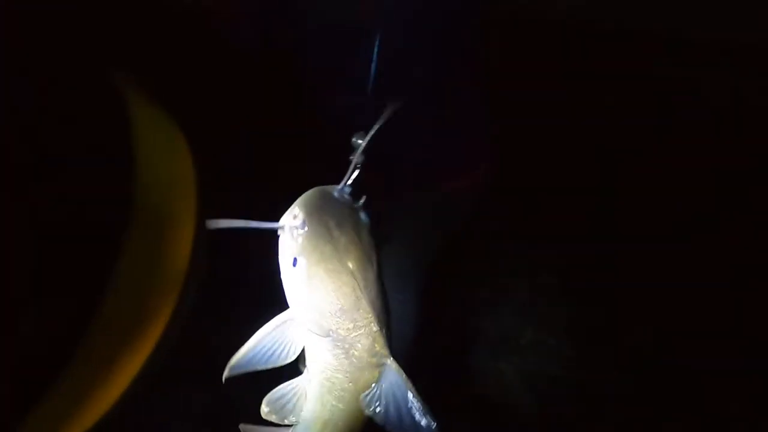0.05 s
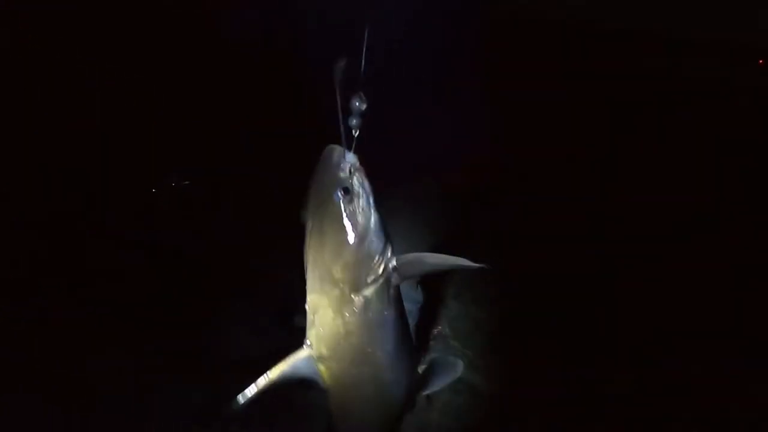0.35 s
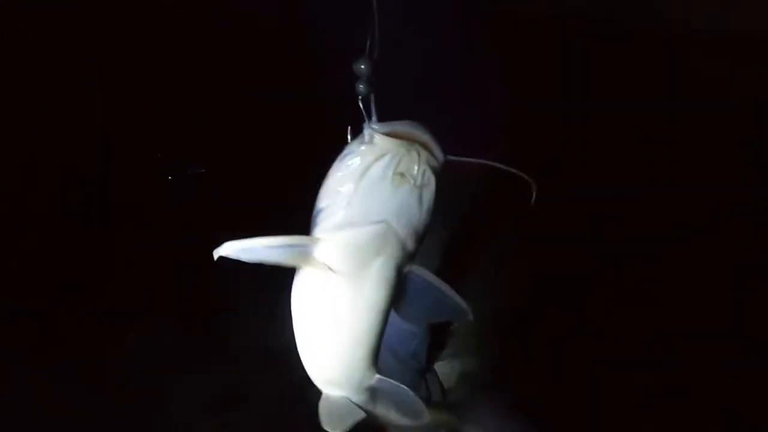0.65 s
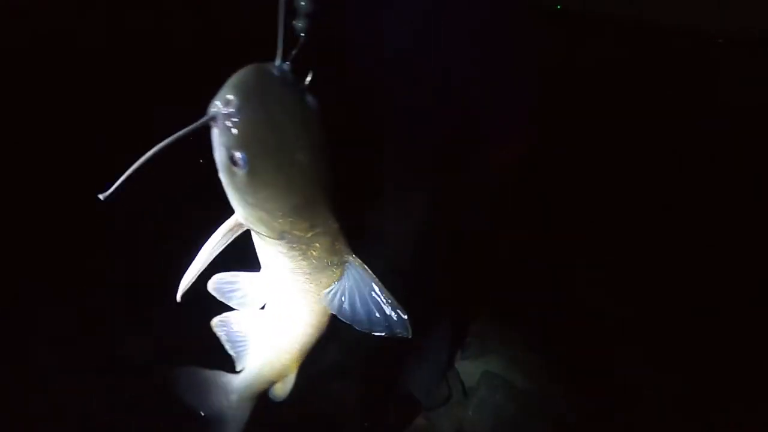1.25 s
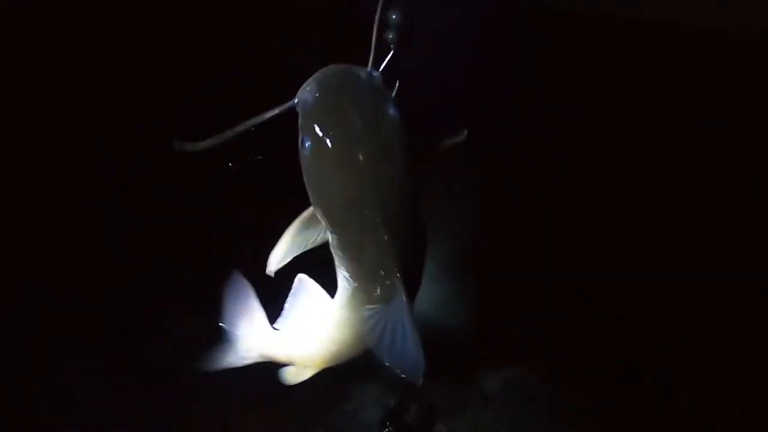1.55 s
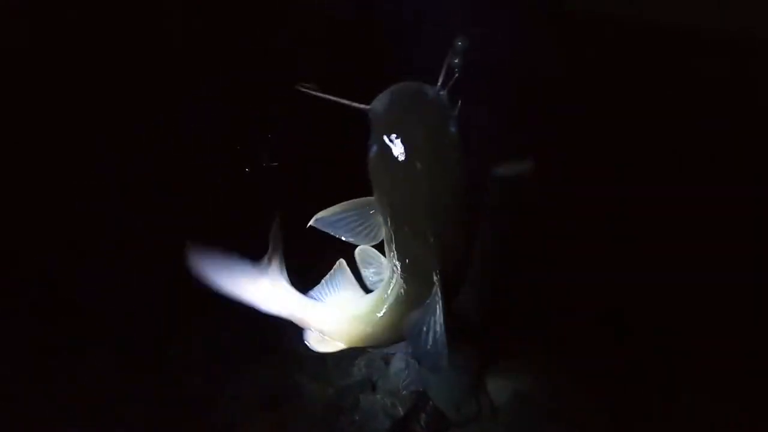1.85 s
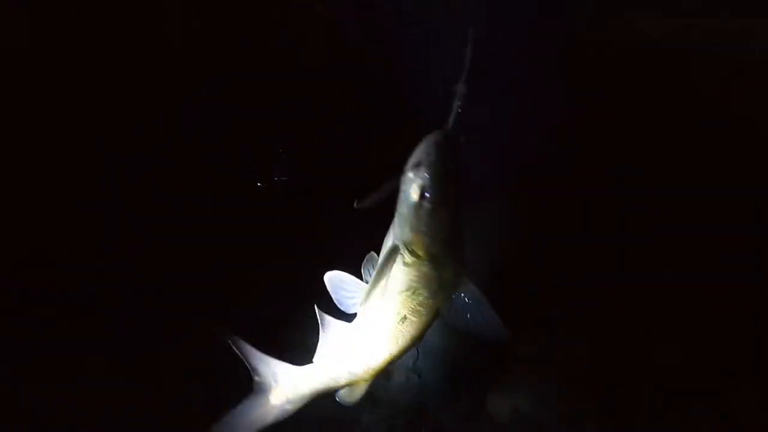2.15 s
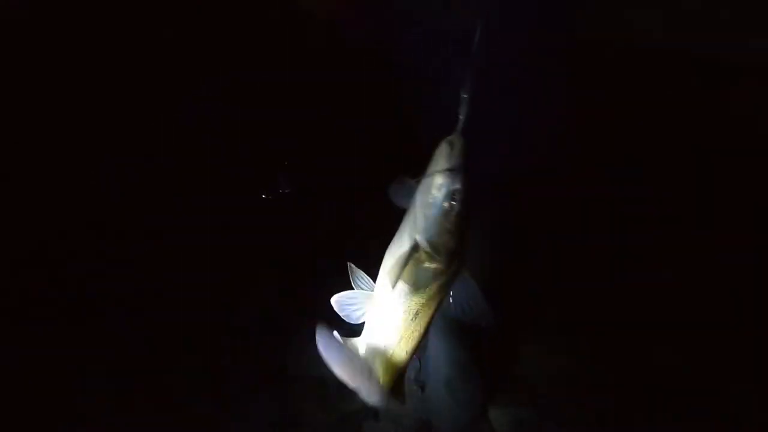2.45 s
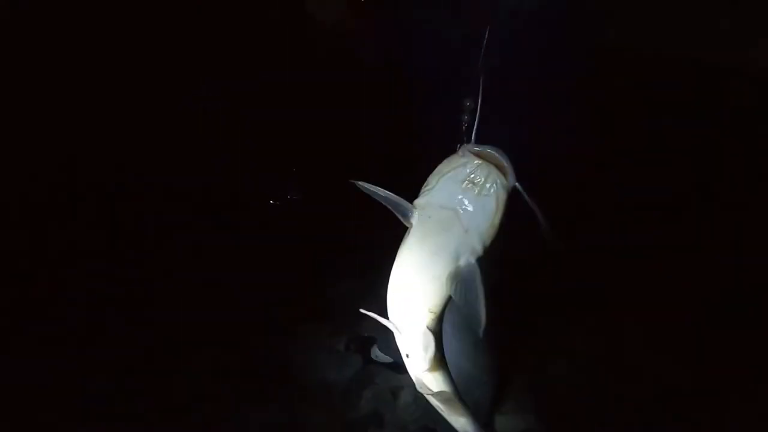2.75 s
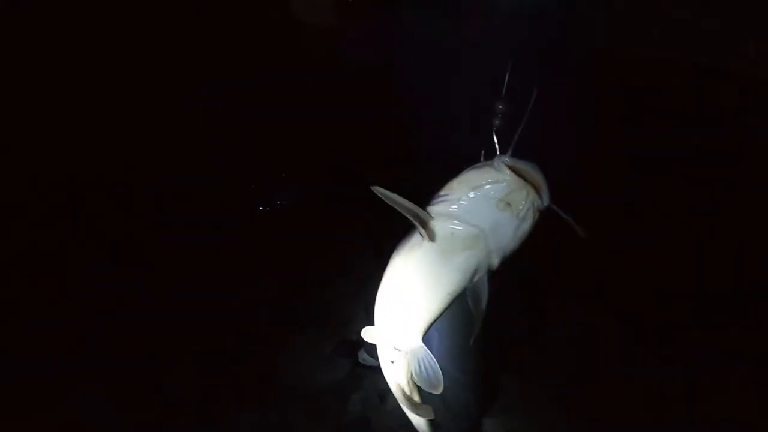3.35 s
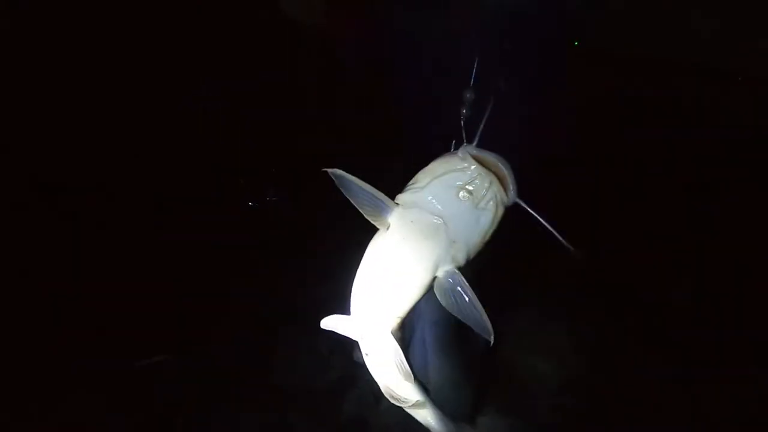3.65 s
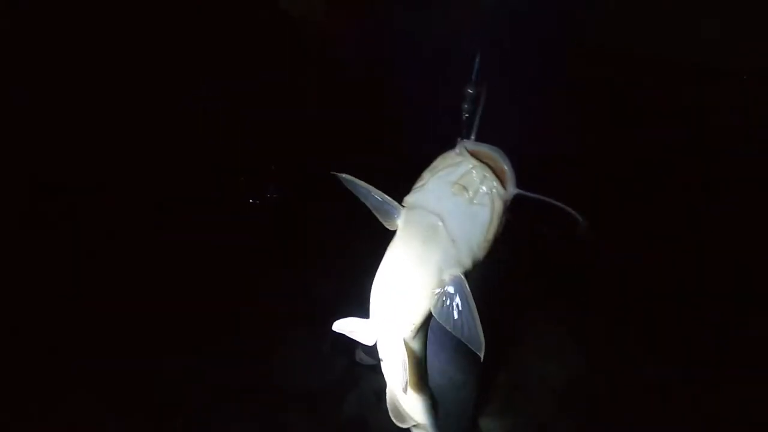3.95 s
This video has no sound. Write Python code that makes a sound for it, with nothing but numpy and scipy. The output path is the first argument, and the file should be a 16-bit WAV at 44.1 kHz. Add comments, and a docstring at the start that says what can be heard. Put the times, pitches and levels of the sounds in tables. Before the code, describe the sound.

A catfish croaks in very short, clicking grunts: a pair at the start, a pair around 1 second with a sharp snap, single croaks near 1.9 and 2.5 seconds, another pair just after 3 and a last one at 3.7. Low wind rumbles and thumps on the microphone throughout, often louder than the fish. Far crickets pulse faintly, with soft rustles around 0.5 seconds and a few tiny ticks.

```python
"""A catfish hangs on a line outdoors at night and croaks by grinding its fin spines in their sockets.
Each stroke is a short run of clicks from tiny ridges that speeds up, slows down and rings the bony body.
In some strokes the spine catches and jerks free with a snap. Wind rumbles and thumps on the microphone.
Behind it are far crickets pulsing together, soft rustles, a few small ticks and faint high squeaks."""
import sys
import numpy as np
from scipy import signal
from scipy.fft import rfft, irfft
from scipy.io import wavfile

SR = 44100
rng = np.random.default_rng(int(sys.argv[2]) if len(sys.argv) > 2 else 0)


def file_out(sig):
    """Save sig as 16-bit WAV at sys.argv[1]."""
    # one column per channel
    cols = np.atleast_2d(sig).T
    # limit, then scale
    lim = np.clip(cols, -1, 1)
    pcm = np.round(lim * 32767).astype(np.int16)
    wavfile.write(sys.argv[1], SR, pcm)


N = 176400
T = np.arange(N) / SR

# The tone of a spine's click. Each row: frequency in Hz, boost or cut in dB.
CLICK_TONE = [(500, -36.5), (1000, 11), (2500, -1), (4200, 9), (5600, 5), (7500, -2), (8600, -2.5),
              (10000, -8.5), (11500, -24), (15000, -51.5)]


def catfish():
    """The fish's fin strokes and jerks, with a short echo from the ground nearby."""
    # Each row: start, length, fastest moment and hardest moment in seconds, top clicks per second,
    # slowing and roughness from 0 to 1, click level in dB, then pitch in Hz and level in dB
    # for each of four ringing tones (body, middle, bone, spine).
    strokes = [ (-.004, 0.063, .028, .02, 501, 0.28, 0.31, -50, 810, -44, 1790, -48, 3320, -47.5, 5140, -67),
               (.079, 0.055, .104, .104, 380, .15, 0.27, -53.5, 790, -42.5, 1750, -50, 3160, -48, 5940, -70),
               (0.942, 0.052, .964, .976, 514.3, 0.28, 0.22, -54.5, 910, -41, 2030, -47.5, 3280, -49.5, 5050, -65),
               (1.042, 0.056, 1.066, 1.066, 453.4, 0.18, 0.42, -51, 820, -38.5, 1720, -50, 3380, -52, 5740, -68),
               (1.853, 0.053, 1.875, 1.879, 566, 0.41, 0.058, -51.5, 910, -39, 2700, -57, 3500, -55.5, 4390, -63),
               (2.509, 0.058, 2.529, 2.532, 555, 0.34, 0.085, -53.5, 980, -38, 2010, -53, 3100, -63, 4770, -66),
               (3.075, 0.053, 3.099, 3.102, 534, .27, 0.03, -52.5, 914, -36.5, 1560, -45, 3150, -48, 4140, -68),
               (3.206, 0.061, 3.229, 3.236, 534.7, 0.28, 0.11, -49, 895, -38, 1490, -45.5, 2940, -42.5, 4150, -59.5),
               (3.699, 0.058, 3.732, 3.736, 514, .22, 0.073, -52.5, 1214, -42.5, 2070, -42.5, 3500, -48.5, 4930, -68)]
    # Each row: start and end of a run of jerks in seconds, jerks per second, ring and snap gains in dB.
    catches = [(.0988, .122, 200, -57, -36.5), (1.0413, 1.06, 71, -37, -27), (1.062, 1.079, 159, -37, -33),
               (3.2334, 3.254, 177, -48, -39)]
    out = np.zeros(N)
    for stroke in strokes:
        add(out, stroke[0], croak(*stroke))
    echo_db, echo_fade_s = -11, .08
    t = T[:SR // 6]
    tail = rng.standard_normal(len(t)) * amp(-60 * t / echo_fade_s) * (t > .002)
    for start, end, rate, ring_db, snap_db in catches:
        for s in np.arange(start, end, 1 / rate):
            add(out, s, jerk(ring_db, snap_db))
    return out + amp(echo_db) * signal.fftconvolve(out, tail / np.linalg.norm(tail))[:N]


def croak(start, length, fastest, hardest, top_hz, droop, roughness, click_db, *rings, size=4096):
    """Ridges click past, faster then slower; the sound is brightest where the spine presses hardest."""
    # One value for each ringing tone: its width in Hz (wider dies away sooner).
    ring_widths = [240, 330, 500, 700]
    # One value for each ringing tone: how closely it follows the pressure, from 0 to 1.
    ring_follows = [.1, .6, .8, .9]
    attack_s, release_s, press_s, shimmer_db = .004, .007, .011, 12
    t = np.arange(size) / SR
    slowness = np.interp(start + t, [start, fastest, start + length], [-1, 0, 1]) ** 2
    rough = roughness + .16 * np.sqrt(slowness)  # the spine grinds less evenly as it slows
    wobble = .018 * drift(70, size) + .17 * rough * drift(260, size)
    ridges_passed = np.cumsum(top_hz * (1 - droop * slowness) * np.exp(wobble)) / SR
    # Stacked overtones add up to one sharp click for each ridge.
    clicks = unit(sum(np.cos(2 * np.pi * k * ridges_passed) for k in range(1, 32)))
    clicks *= amp(shimmer_db * rough * drift(260, size))
    scrape = 1.3 * rough * rng.standard_normal(size)
    fade = np.clip(t / attack_s, 0, 1) * np.clip((length - t) / release_s, 0, 1)
    grind = (clicks + scrape) * fade
    pressure = .2 + np.exp(-.5 * ((start + t - hardest) / press_s) ** 2)
    sound = amp(click_db) * unit(colour(grind * pressure, CLICK_TONE))
    for hz, db, width, follow in zip(rings[::2], rings[1::2], ring_widths, ring_follows):
        sound += amp(db) * unit(ring(grind * pressure ** follow, hz, width))
    return sound * np.sqrt(length * SR / size)  # so the levels apply to the stroke, not the silence


def jerk(ring_db, snap_db, size=2048):
    """One hard slip of the spine makes a snap and sets the bones ringing."""
    # Each row: pitch in Hz, relative level in dB, seconds to fade by 60 dB.
    bone_tones = [(890, -3, 0.036), (1720, -8.5, 0.086), (3120, -2.5, 0.053), (2870, -7, 0.011),
                  (3800, -5.5, 0.018), (5500, -7.5, 0.013), (8700, -9.5, 0.01), (10500, -22.5, 0.012)]
    t = np.arange(size) / SR
    bones = np.zeros(size)
    for hz, db, fade_s in bone_tones:
        pitch = hz * (1 + .01 * rng.standard_normal())
        bones += amp(db - 60 * t / fade_s) * np.sin(2 * np.pi * pitch * t)
    snap = colour(rng.standard_normal(size) * np.exp(-t / .00011), CLICK_TONE)
    snap = snap / abs(snap).max() * (t < t[-1] / 2)
    treble_cut = signal.butter(8, 10800, fs=SR, output="sos")
    return signal.sosfilt(treble_cut, amp(ring_db) * bones + amp(snap_db) * snap)


def wind_rumble():
    """Wind presses on the microphone; small swirls of air come and go faster than big ones."""
    # Each row: frequency in Hz, boost or cut in dB.
    rumble_tone = [(8, -19.5), (25, 1), (55, -0.5), (88, -0.5), (125, -5.5), (180, -12.5), (260, -21),
                   (400, -38.5), (700, -52.5), (1400, -64), (15000, -130)]
    # Each row: time in seconds, relative level in dB.
    wind_levels = [(0.0, -21), (0.97, -26.5), (0.98, -21), (2.16, -23), (2.18, -36), (2.26, -20),
                   (2.39, -37.5), (2.55, -20), (2.66, -36), (2.78, -18.5), (3.07, -26.5), (3.09, -21.5),
                   (3.48, -22.5), (3.53, -14.5), (3.58, -32.5), (3.71, -20), (3.95, -23.5), (4.0, -41)]
    split_hz, deep_flutter_db, upper_flutter_db = 150, .36, 11
    air = unit(colour(rng.standard_normal(N), rumble_tone))
    small_swirls = irfft(rfft(air) / (1 + (split_hz / frequencies(N)) ** 4), N)
    deep = (air - small_swirls) * amp(deep_flutter_db * drift(12))
    upper = small_swirls * amp(upper_flutter_db * np.tanh(drift(18)))
    level_db = 1.5 + np.interp(T, *np.transpose(wind_levels))
    sway = amp(-31.5) * drift(50)  # the slowest pressure swings go on through the lulls
    return unit(deep + upper) * amp(level_db) + sway


def wind_gusts(size=8192):
    """Each gust is a brief, low swell of churning air, some duller and some brighter."""
    # Each row: middle and length in seconds, relative level in dB, Hz where the treble falls away.
    gusts = [(0.052, 0.023, -19.5, 394), (0.094, 0.03, -24.5, 516), (0.136, 0.051, -19, 510),
             (0.218, 0.0078, -21.5, 474), (0.321, 0.018, -21.5, 497), (0.371, 0.02, -15, 750),
             (0.466, 0.013, -21.5, 453), (0.506, 0.019, -24, 585), (0.733, 0.035, -23, 278),
             (0.785, 0.017, -19, 273), (0.979, 0.011, -13, 429), (1.155, 0.017, -16, 416),
             (1.196, 0.014, -26, 340), (1.252, 0.025, -19.5, 323), (1.297, 0.036, -20, 440),
             (1.326, 0.026, -16.5, 500), (1.466, 0.0094, -27.5, 480), (1.616, 0.011, -27, 430),
             (1.57, 0.012, -16, 450), (1.651, 0.023, -17.5, 640), (1.812, 0.022, -23, 358),
             (1.957, 0.08, -24, 220), (1.987, 0.016, -25.5, 350), (2.047, 0.027, -21.5, 390),
             (2.079, 0.014, -25, 443), (2.144, 0.026, -23.5, 330), (2.228, 0.02, -16.5, 257),
             (2.543, 0.04, -28, 600), (2.836, 0.039, -20, 452), (2.883, 0.029, -23, 500),
             (3.018, 0.018, -21.5, 313), (3.141, 0.011, -16.5, 441), (3.218, 0.0069, -27, 556),
             (3.243, 0.019, -25.5, 710), (3.259, 0.0086, -18, 603), (3.291, 0.0071, -20.5, 361),
             (3.393, 0.02, -19, 330), (3.489, 0.015, -17.5, 507), (3.543, 0.019, -15, 388),
             (3.647, 0.013, -23.5, 236), (3.767, 0.0077, -27, 320), (3.819, 0.018, -15, 270),
             (3.86, 0.044, -23.5, 394), (3.895, 0.029, -18.5, 356), (3.955, 0.029, -25, 253),
             (3.988, 0.018, -11.5, 390)]
    low_cut_hz, flutter_db = 107, 4
    out, t = np.zeros(N), (np.arange(size) - size / 2) / SR
    for middle, length, db, top_hz in gusts:
        swell = 1 / np.cosh(t / (.44 * length))
        air = noise(lambda f: (1 + (f / top_hz) ** 2) ** -2.248 / np.hypot(1, (low_cut_hz / f) ** 2), size)
        flutter = amp(flutter_db * drift(90, size))
        puff = unit(air * swell * flutter) * np.sqrt(np.mean(swell ** 2))
        add(out, middle + t[0], amp(db - 1) * puff)
    return out


def wind_thuds(pitch_hz=423, size=2048):
    """A swirl of air strikes the microphone with a very short thud."""
    # Each row: time in seconds, level in dB, fade time in seconds.
    thuds = [(.1548, -17, 0.00044), (.3263, -19, 0.00046), (0.364, -27, 0.004), (0.3689, -21, 0.0012),
             (.3804, -24, 0.0011), (0.9823, -28, 0.00033), (1.165, -33, 0.00065), (1.3209, -15.5, 0.00028),
             (1.5673, -22, 0.0004), (1.6506, -8, 0.00027), (1.6687, -14, 0.0023), (1.8006, -21, 0.00078),
             (2.049, -30, 0.00076), (3.017, -28.5, 0.00084), (3.1366, -27.5, 0.0015),
             (3.1483, -23.5, 0.0014), (3.2649, -15.5, 0.00045), (3.3855, -23.5, 0.00099),
             (3.4926, -16, 0.00028), (3.5352, -16, 0.001), (3.8563, -18, 0.00059), (3.8908, -16.5, 0.00088)]
    out, t = np.zeros(N), (np.arange(size) - size / 2) / SR
    for s, db, fade_s in thuds:
        wave = np.sin(2 * np.pi * (pitch_hz * t + rng.random()))
        add(out, s + t[0], amp(db) * wave / np.cosh(t / fade_s))
    return out


def crickets():
    """Far crickets chirp together, each chirp sagging a little in pitch."""
    # Each row: time in seconds, relative level in dB.
    chorus_levels = [(0, -49.5), (.8, -53), (2.0, -51.5), (2.4, -52.5), (2.75, -48), (3.2, -53.5),
                     (3.55, -56.5), (4, -52.5)]
    pitch_hz, width_hz, sag_hz = 2101, 143, 25.2
    period_s, peak_at_s, pulse_db, waver_db = .1775, 2.38, 3.5, 2.16
    pulse = np.cos(2 * np.pi * (T - peak_at_s) / period_s)
    band = noise(lambda f: 1 / (1 + (abs(f - pitch_hz) / width_hz) ** 2.7))
    trill = (signal.hilbert(band) * np.exp(1j * sag_hz * period_s * pulse)).real  # bends the pitch
    chorus_db = np.interp(T, *np.transpose(chorus_levels)) - 2
    return trill * amp(chorus_db + pulse_db * pulse + waver_db * drift(21))


def night_air():
    """A faint, steady hiss."""
    # Each row: frequency in Hz, boost or cut in dB.
    air_tone = [(200, 14), (700, -2.5), (1300, 5.5), (2500, 4.5), (3600, -2.5), (5500, -2.5), (7800, -4.5),
                (9000, -12), (11000, -21.5), (15000, -34.5)]
    return amp(-62) * unit(colour(rng.standard_normal(N), air_tone))


def rustles(top_hz=8800, grain_db=1.2, size=32768):
    """Soft, slightly grainy swells of hiss."""
    # Each row: middle and length in seconds, level in dB, centre in Hz, spread in octaves.
    swells = [(0.178, 0.39, -57, 1540, 1.3), (0.348, 0.055, -53, 1600, 0.62),
              (0.455, 0.059, -50, 1800, 1.17), (0.516, 0.058, -44, 970, 1.29),
              (0.612, 0.085, -53, 1750, 1.07), (0.683, 0.041, -49, 2030, 0.93),
              (0.742, 0.081, -54.5, 3720, 0.63), (0.743, 0.084, -60, 4160, 0.067),
              (1.211, 0.37, -61, 1350, 0.24), (1.557, 0.18, -66, 5950, 0.2),
              (1.612, 0.067, -60, 2750, 0.54), (2.659, 0.074, -61, 3470, 1.5),
              (2.895, 0.22, -57, 2000, 1.06), (3.469, 0.21, -60.5, 2950, 0.83),
              (3.945, 0.22, -60, 2630, 0.81)]
    out, t = np.zeros(N), (np.arange(size) - size / 2) / SR
    for middle, length, db, hz, octaves in swells:
        hiss = noise(lambda f: hump(f, hz, octaves) / (1 + (f / top_hz) ** 8), size)
        swell = np.exp(-abs(2 * t / length) ** 3 / 2)
        add(out, middle + t[0], hiss * swell * amp(db + grain_db * drift(200, size)))
    return out


def ticks(fade_s=.0024, size=1024):
    """Tiny dry ticks of fishing tackle or drops."""
    # Each row: start in seconds, relative level in dB, pitch in Hz.
    taps = [(0.359, -44, 3900), (2.464, -42.5, 4100), (2.783, -43, 3400), (3.146, -45.5, 3400),
            (2.208, -58, 9200)]
    out, t = np.zeros(N), np.arange(size) / SR
    fade = np.minimum(2 * t / fade_s, 1) * np.exp(-t / fade_s)
    for s, db, hz in taps:
        add(out, s, amp(db) * fade * noise(lambda f: hump(f, hz, octaves=.28), size))
    return out


def squeaks(width_s=.0099):
    """Brief, faint and very high wisps of sound."""
    # Each row: middle in seconds, level in dB.
    wisps = [(1.543, -76), (2.272, -79), (2.8, -78)]
    level = sum(amp(db) * np.exp(-.5 * ((T - s) / width_s) ** 2) for s, db in wisps)
    return level * noise(lambda f: hump(f, centre_hz=10250, octaves=.049))


def amp(db):
    """Turns decibels into a number to multiply by."""
    return 10 ** (np.asarray(db) / 20)


def unit(x):
    """Scales a sound to an average strength (rms) of 1."""
    return x / np.sqrt(np.mean(x ** 2) + 1e-20)


def frequencies(size):
    """The frequencies in a sound of this many samples, never below 1 Hz."""
    return np.maximum(np.fft.rfftfreq(size, 1 / SR), 1)


def colour(x, points):
    """Shapes a sound's tone along a curve of (Hz, dB) points."""
    f, db = np.transpose(points)
    hz = np.fft.rfftfreq(len(x), 1 / SR)
    gain = amp(np.interp(np.log(hz + 1), np.log(f), db))
    return irfft(rfft(x) * gain, len(x))


def noise(shape, size=N):
    """Noise of strength 1; shape says how much of each frequency it holds."""
    return unit(irfft(rfft(rng.standard_normal(size)) * shape(frequencies(size)), size))


def drift(rate_hz, size=N):
    """Random wandering of strength 1, mostly slower than rate_hz."""
    return noise(lambda f: 1 / (1 + (f / rate_hz) ** 4), size)


def hump(hz, centre_hz, octaves):
    """A bell-shaped curve around one pitch."""
    return np.exp(-.5 * (np.log2(hz / centre_hz) / octaves) ** 2)


def ring(x, hz, width_hz):
    """Makes a sound ring at one pitch by filtering it twice."""
    b, a = signal.iirpeak(hz, hz / (1.5 * width_hz), SR)
    return signal.lfilter(b, a, signal.lfilter(b, a, x))


def add(mix, s, sound):
    """Adds a sound to the mix, starting at s seconds."""
    at = round(s * SR)
    sound = sound[max(-at, 0):]
    part = mix[max(at, 0):][:len(sound)]
    part += sound[:len(part)]


def scene():
    """Mixes the fish, the wind and the night into one channel."""
    wind = wind_rumble() + wind_gusts() + wind_thuds()
    night = crickets() + night_air() + rustles() + ticks() + squeaks()
    return (catfish() + wind + night)[None]


def record(dry):
    """Cuts the treble above 15100 Hz."""
    treble_cut = signal.firwin(511, 15100, window=("kaiser", 9), fs=SR)
    return signal.oaconvolve(dry, treble_cut[None], "same")


dry = scene()
out = record(dry)
file_out(out)
```